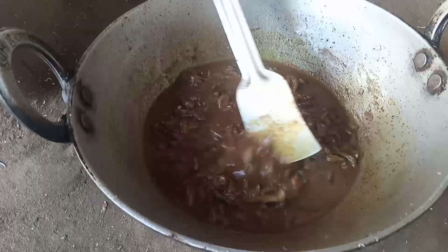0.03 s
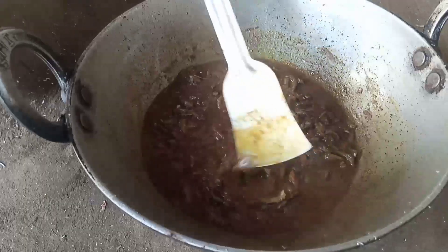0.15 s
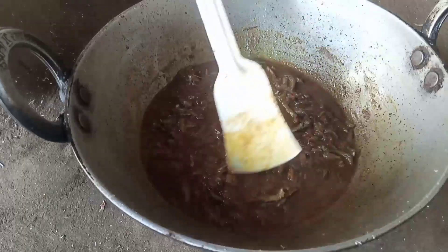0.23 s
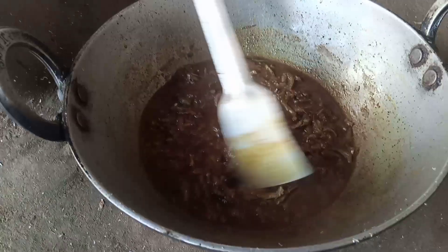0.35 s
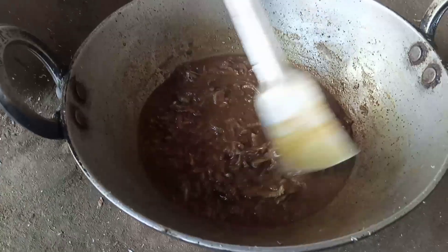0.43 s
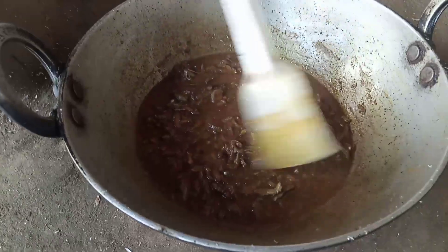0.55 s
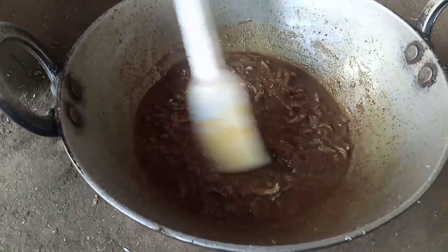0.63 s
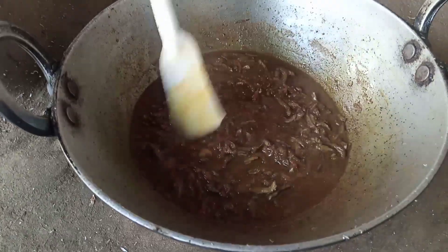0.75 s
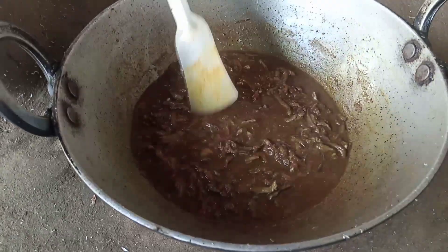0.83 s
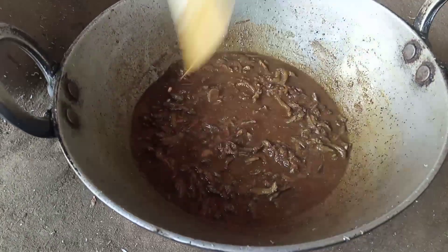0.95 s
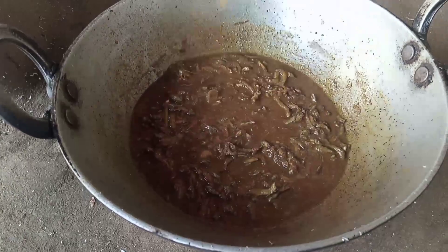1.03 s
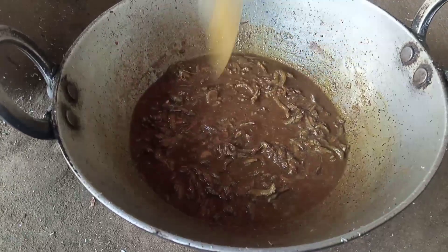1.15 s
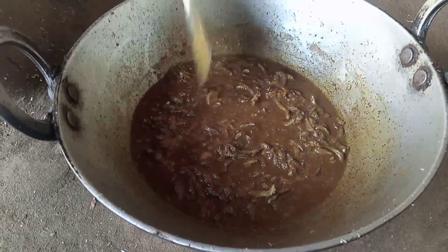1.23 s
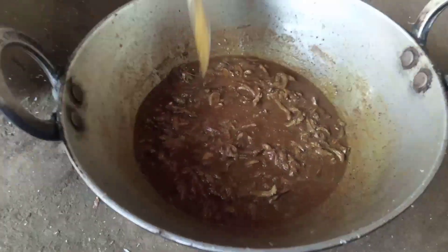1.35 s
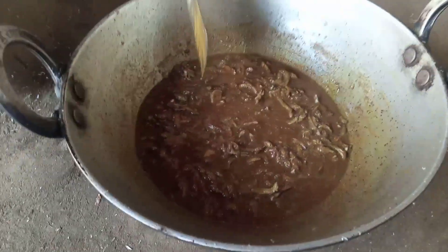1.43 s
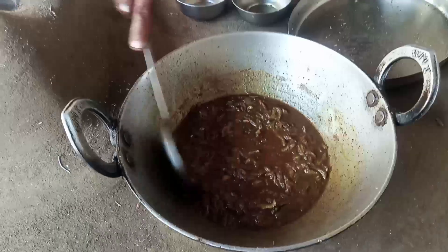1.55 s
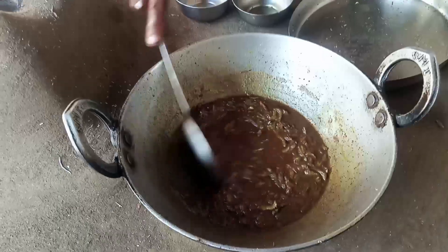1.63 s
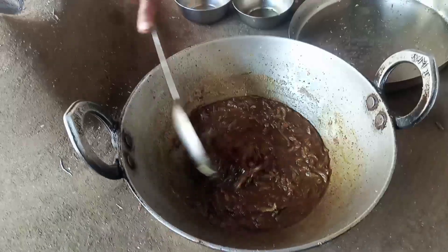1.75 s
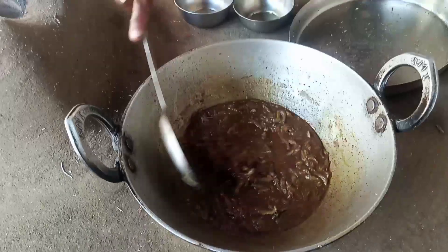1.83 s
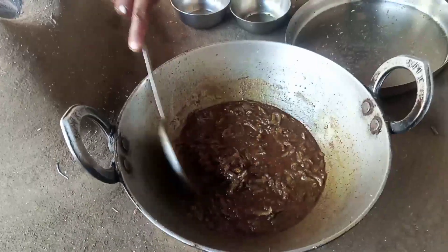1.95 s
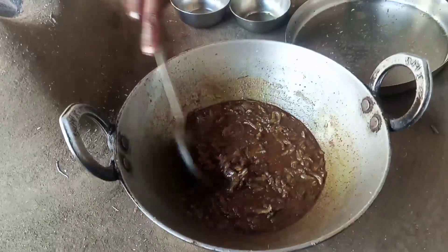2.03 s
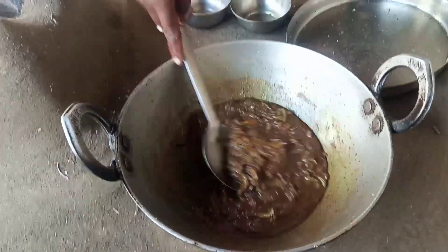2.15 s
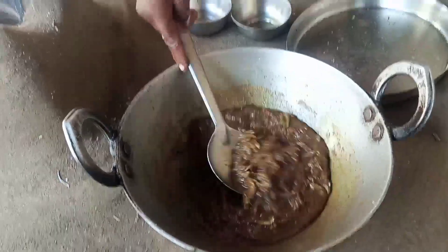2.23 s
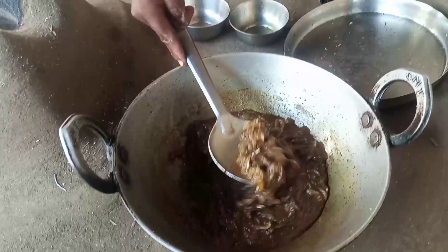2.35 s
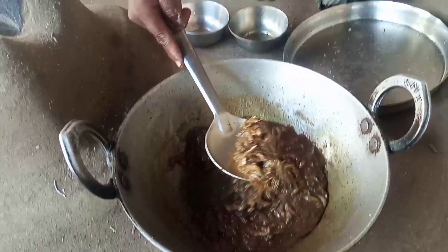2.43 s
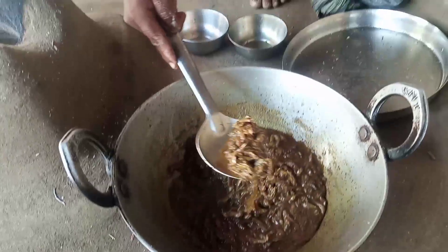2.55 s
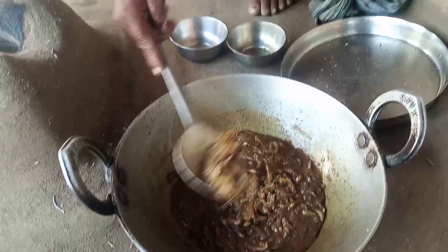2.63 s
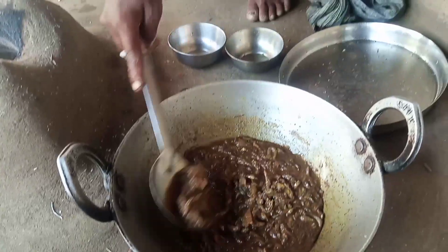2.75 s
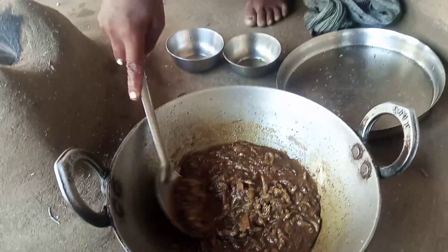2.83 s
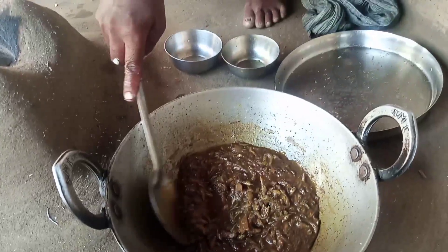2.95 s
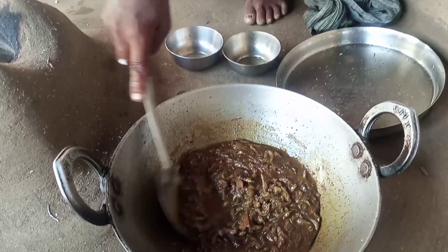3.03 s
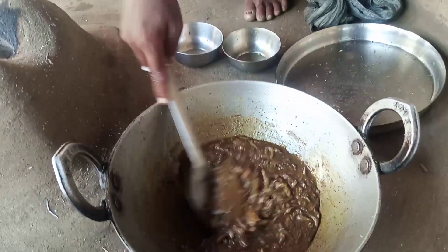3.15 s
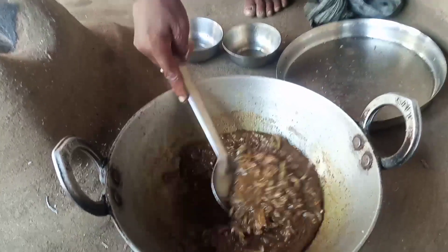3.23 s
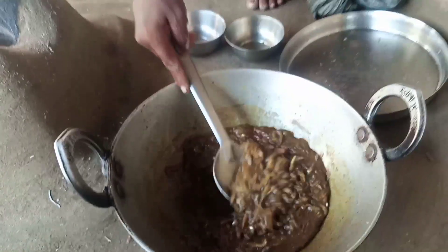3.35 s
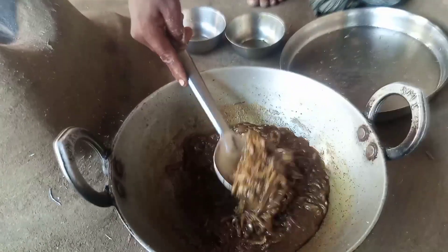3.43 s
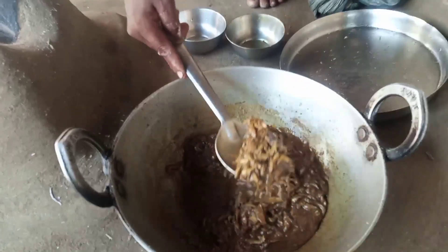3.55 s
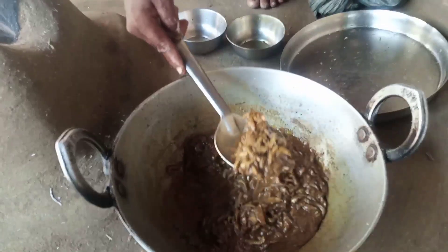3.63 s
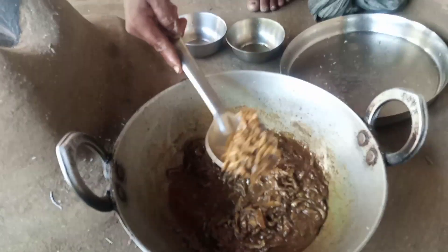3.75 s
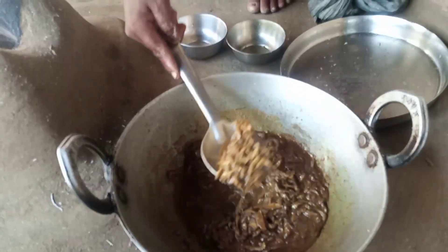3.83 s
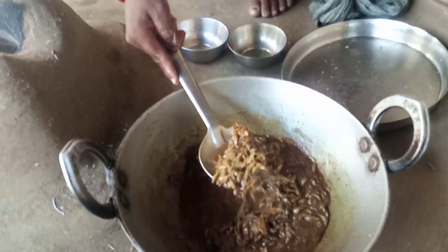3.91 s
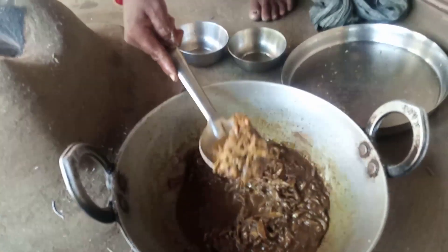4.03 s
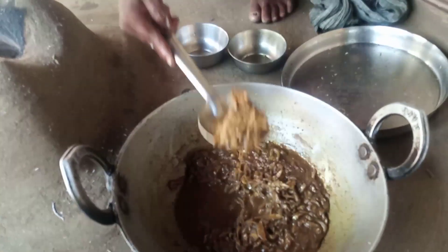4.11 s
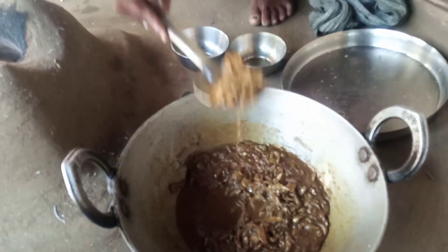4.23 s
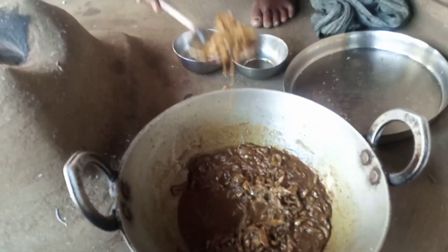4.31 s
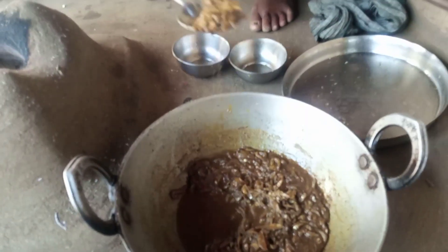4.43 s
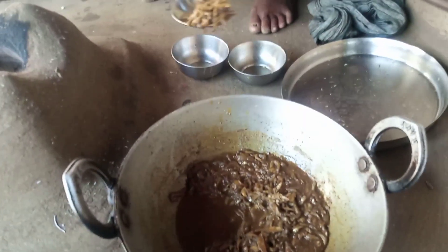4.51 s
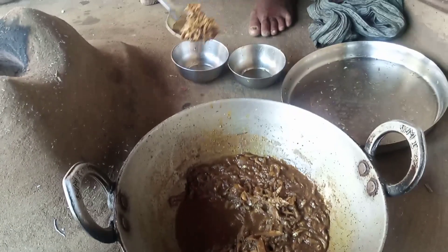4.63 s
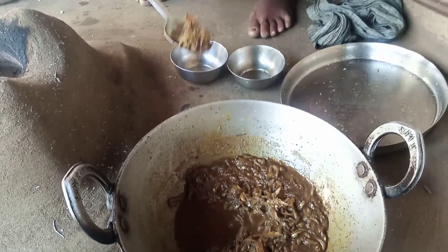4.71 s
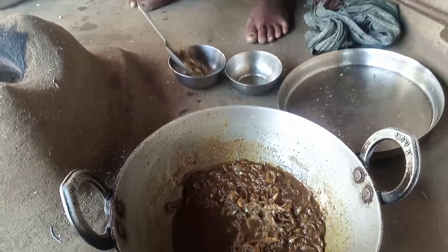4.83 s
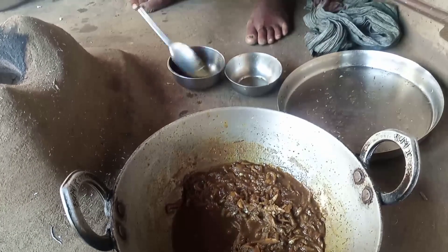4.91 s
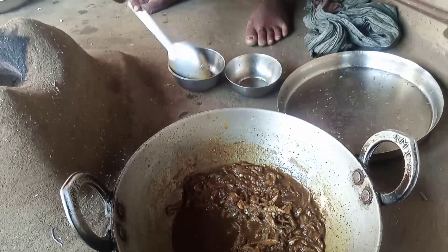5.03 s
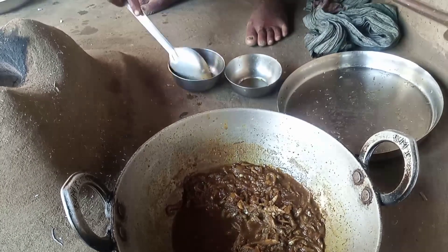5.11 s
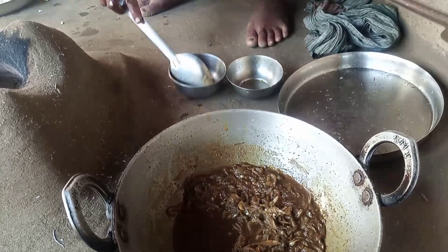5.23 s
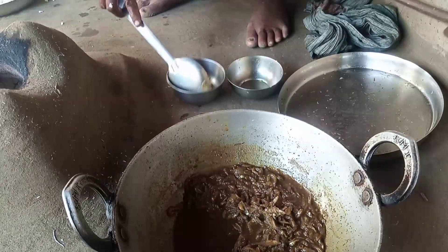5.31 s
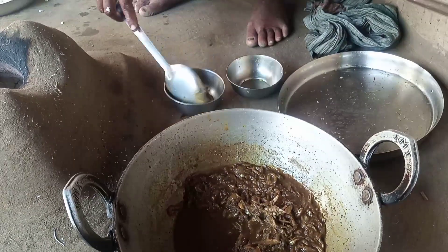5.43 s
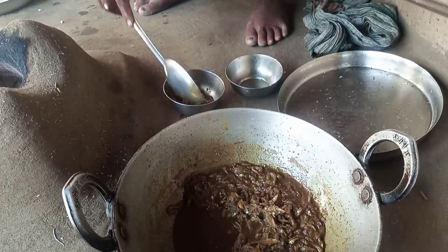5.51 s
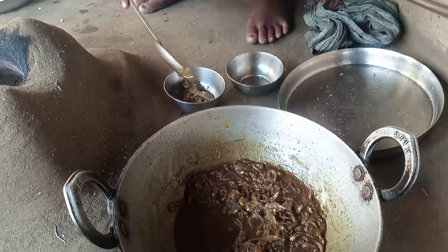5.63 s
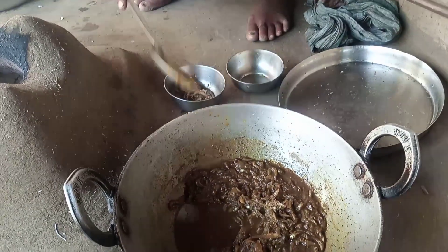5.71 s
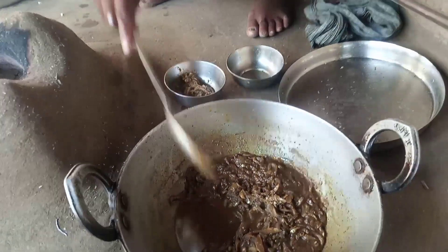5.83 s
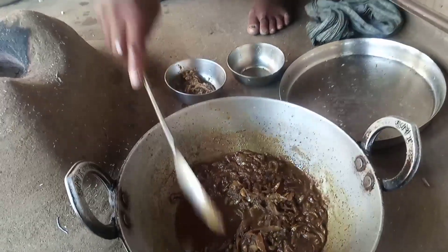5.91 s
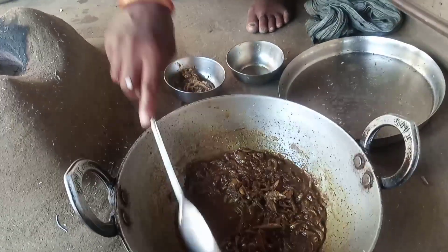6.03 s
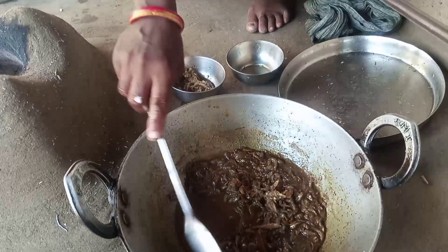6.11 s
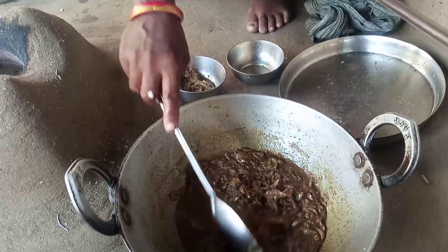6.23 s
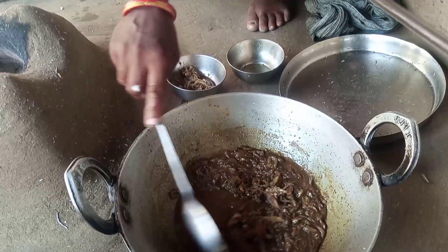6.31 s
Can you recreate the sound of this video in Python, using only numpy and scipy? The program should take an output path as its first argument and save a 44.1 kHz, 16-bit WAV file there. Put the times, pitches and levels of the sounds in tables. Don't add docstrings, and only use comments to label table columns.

```python
import sys
import numpy as np
from scipy import signal
from scipy.fft import rfft, irfft, next_fast_len
from scipy.io import wavfile
from scipy.ndimage import uniform_filter1d

SR = 44100
rng = np.random.default_rng(int(sys.argv[2]) if len(sys.argv) > 2 else 0)


def convert_level_to_amplitude(level_db):
    exponent = np.asarray(level_db, float) / 20
    return 10 ** exponent


def persist_wave(psi):
    counts = np.round(np.clip(psi, -1, 1) * 32767).astype(np.int16)
    wavfile.write(sys.argv[1], SR, np.atleast_2d(counts).T)


N = 280917
T = np.arange(N) / SR
LOG_60DB = np.log(1000)

# start_s, end_s
SILENCE_S = (1.484, 1.635)
# start_s, end_s
SCOOP_SPAN_S = (3.0, 3.35)

# low_hz, high_hz
REGISTERS = [(500, 2400), (2400, 8000), (8000, 15800)]
# pitch_hz, level_db, t60_s
POT_SIDE_MODES = [(685, -10.5, 0.013), (1108, -10, 0.059), (1353, 1, 0.032), (1565, 2.5, 0.069),
                  (2051, -12, 0.02), (2670, -8, 0.017), (1628, -3, 0.032), (4600, -11, 0.06),
                  (5230, -6.5, 0.031), (880, -7, 0.02), (6337, -1, 0.054), (7450, -11, 0.05)]
# pitch_hz, level_db, t60_s
POT_FLOOR_MODES = [(773, -1.5, 0.0206), (1738, -3, 0.036), (2480, -15, 0.048), (3053, -1, 0.059),
                   (4210, -16, 0.041), (4310, -4, 0.018), (5140, 5.5, 0.011), (6450, 2, 0.0099),
                   (6900, -3.5, .04), (7050, -1, 0.008)]
# pitch_hz, level_db, t60_s
BOWL_MODES = [(781, -34, .4), (1453, -21, 0.6), (2272, -27, .5), (3225, -24, 0.25), (4274, -24, 0.3),
              (5362, -21, 0.19), (6422, -14, 0.14), (9830, 0, 0.058), (10450, -5, 0.065),
              (10570, -14, 0.094), (11320, -11, 0.096), (7640, -24, 0.3), (14580, -16, 0.082),
              (15150, -18, 0.08)]
# pitch_hz, level_db, t60_s
SPOON_MODES = [(1195, -1, 0.17), (1448, 0, 0.09), (1685, -8, 0.32), (2272, -7, 0.47), (3100, -16, 0.05),
               (4544, -16, 0.13), (5663, -2, 0.28), (6385, -5, 0.15), (7133, -10, 0.093), (7386, -6, 0.14),
               (7650, 0, 0.2), (8430, -11, 0.2), (9620, -5, 0.07), (9900, -2, 0.07), (11480, -10, 0.13),
               (14610, -7, 0.11), (15340, -7, 0.084)]
# pitch_hz, level_db, t60_s
HANDLE_MODES = [(1895, -1, 0.88), (2848, -5, 0.064), (3714, -1, 0.97), (4678, 0, 0.25), (5782, -7, 0.2),
                (6735, -7, 0.098), (7510, -12, 0.13), (9598, -10, 0.14), (11310, -6, 0.054),
                (14870, -9, 0.12)]
# pitch_hz, width_hz, level_db
POT_WET_PEAKS = [(678, 85, 1), (1111, 58, 1), (1783, 44, -13.5), (2626, 30, -4), (4530, 61, -1.5),
                 (5730, 44, -2.5), (6500, 50, -12), (7360, 77, -9), (7620, 27, -20.5), (8520, 51, -13),
                 (9770, 110, -7), (10300, 91, -11), (11100, 42, -14), (11900, 31, -15)]
# pitch_hz, width_hz, level_db
BOWL_RIM_PEAKS = [(1344, 110, -12), (2470, 40, -7.5), (4380, 110, -6), (5680, 73, -10), (6170, 45, -8),
                  (6800, 67, -4.5), (7070, 69, -13), (7540, 86, -18), (8870, 52, -14), (10000, 38, -4),
                  (10700, 78, -7), (11300, 70, -5.5), (14200, 57, -10), (14600, 160, -5)]
# pitch_hz, width_hz, level_db
SPOON_EDGE_PEAKS = [(8740, 43, -1), (9530, 40, -3), (10500, 46, -7.5), (11500, 130, -11.5),
                    (11600, 350, -13), (12800, 63, -20), (14200, 54, -10), (14600, 94, -5.5),
                    (15300, 230, -7)]

# start_s, rim_db, wall_db (the spoon's edge follows the rim)
POT_HITS = [(1.6789, -43.5, -83), (2.0874, -8, -22.5), (2.135, -11.5, -24.5), (2.1473, -28, -28),
            (2.157, -16.5, -25.5), (2.172, -33, -42), (2.1755, -23, -34), (2.1795, -23, -33.5),
            (2.212, -38.5, -38), (2.635, -84.5, -59), (2.9162, -14.5, -33.5), (3.1443, -41.5, -86),
            (3.1647, -47.5, -60), (3.1759, -27, -47.5), (3.1915, -29.5, -49), (3.2093, -18, -36),
            (3.2267, -20.5, -36), (3.2402, -29, -64), (3.2526, -20.5, -61), (3.2585, -37, -60),
            (3.2906, -33.5, -44.5), (3.3115, -43, -63), (3.342, -67, -83), (3.3685, -36.5, -43.5),
            (4.0611, -42.5, -80.5), (4.0918, -58, -66), (5.7978, -39, -72), (6.1733, -44.5, -44),
            (6.177, -42, -46), (6.1982, -47, -59), (6.2047, -51, -58), (6.2135, -45, -55.5),
            (6.2605, -60, -74)]
# start_s, rim_db, wall_db
BOWL_HITS = [
    (4.9566, -23, -29.5),
    (5.018, -23.5, -39),
    (5.0875, -45.5, -55.5),
    (5.1348, -19, -41.5),
    (5.3091, -36.5, -51.5),
]
# start_s, rim_db, wall_db
SPOON_HITS = [
    (5.1339, -16.5, -45.5),
    (5.153, -23, -51),
    (5.1645, -22.5, -71),
]
# start_s, rim_db, wall_db
HANDLE_HITS = [
    (4.955, -10.5, -51),
    (5.019, -14, -30.5),
    (5.2347, -21, -33.5),
    (5.2438, -23, -43),
    (5.253, -25.5, -34.5),
    (5.2604, -20.5, -48),
    (5.311, -30.5, -50),
    (5.32, -29.5, -45),
    (6.2617, -50.5, -60),
]
# start_s, rim_db, wall_db
RIM_HITS = [
    (5.3977, -47, -66),
    (5.4593, -40.5, -54),
    (5.638, -61, -67),
]

# peak_s, press_s, release_s, level_db, brightness_db
POT_SCRAPES = [(1.669, 0.052, 0.067, -65.5, 6), (2.142, 0.0044, 0.056, -29.5, 3),
               (2.18, 0.021, 0.077, -36, -6), (2.238, 0.16, 0.03, -42.5, -1),
               (2.489, 0.15, 0.3, -59.5, -31.5), (2.87, 0.053, 0.14, -69, -13),
               (2.92, .003, 0.0086, -43, -9), (3.194, 0.1, 0.048, -65, 14.5),
               (3.224, 0.057, .13, -37.5, -7.5), (4.29, 0.03, 0.3, -67.5, -15), (4.36, 0.045, 0.49, -77, 1),
               (5.634, 0.11, 0.066, -63.5, -4), (5.81, 0.047, 0.079, -64, 5.5),
               (6.183, 0.012, 0.05, -61.5, -9), (6.209, 0.059, 0.028, -55, 4),
               (6.251, 0.11, 0.27, -72.5, 4)]
# peak_s, press_s, release_s, level_db, brightness_db
SPOON_SCRAPES = [
    (5.143, 0.01, 0.084, -40, 5),
    (5.248, 0.077, 0.064, -52, -1.5),
    (5.302, 0.0057, 0.093, -51.5, -36.5),
    (5.38, 0.79, 0.13, -66, 10),
]
# peak_s, press_s, release_s, level_db, brightness_db
RIM_SCRAPES = [
    (5.42, 0.067, .06, -63, 6.5),
    (5.476, 0.048, 0.17, -53, 7.5),
    (5.545, 0.2, 0.057, -60, 7),
]
# peak_s, press_s, release_s, level_db,
# brightness_db
SOFT_RUSTLES = [(.022, 0.033, 0.22, -73.5, 13), (.45, 0.012, 0.079, -73.5, -3),
                (.575, 0.022, 0.06, -66.5, -2), (.61, 0.056, 0.042, -67, 4), (.69, 0.1, 0.13, -73, -28),
                (1.13, 0.083, 0.17, -73.5, 5), (1.39, 0.3, 0.13, -62.5, 11.5),
                (1.478, 0.15, 0.058, -55, 8), (2.5, 0.12, 0.07, -65, -23), (5.77, .07, .12, -71.5, 12.5),
                (4.93, 0.89, 0.19, -68, 1), (6.0, 1, 0.56, -77, 3)]
# low_hz, high_hz
RUSTLE_BANDS = [(500, 3400), (1500, 4740), (4800, 21000)]

# start_s, level_db, pitch_hz
POT_THUDS = [(1.302, -51.5, 240), (1.379, -54, 115), (2.088, -33.5, 240), (2.134, -43.5, 221),
             (2.177, -41, 204), (2.632, -47.5, 125.7), (2.694, -52.5, 178), (2.735, -59, 173),
             (2.797, -55, 105.5), (2.918, -46, 239), (2.715, -53.5, 175.4), (2.755, -55, 172),
             (2.775, -57.5, 175), (1.17, -62, 480), (3.67, -58, 300), (3.366, -49.5, 213),
             (4.395, -51.5, 230), (4.954, -53, 131), (5.61, -42.5, 258), (5.783, -45.5, 229),
             (5.796, -38, 226), (5.94, -61, 250), (5.977, -53, 360), (5.99, -54, 300), (6.012, -57, 250),
             (6.172, -40.5, 232)]
# start_s, level_db, pitch_hz
FOOD_TICKS = [(0.019, -47, 7000), (.1794, -52, 9000), (.4394, -50, 9200), (.5894, -56, 9500),
              (.6848, -60, 3870), (1.111, -48, 8900), (1.3092, -48, 1950), (1.3675, -46.5, 1120),
              (.468, -65, 4670), (.47, -66.5, 2400), (2.359, -69, 7000), (2.392, -62.5, 4950),
              (2.472, -66, 9150), (3.393 , -66, 10000), (3.611, -65, 4520), (3.634, -65.5, 6500),
              (4.046, -63.5, 6500), (2.4314, -54, 9400), (2.5306, -60, 8650), (3.5241, -60.5, 7830),
              (3.617, -44.5, 15500), (3.918, -53.5, 14830), (4.2033, -55, 10100), (4.344, -54, 8850),
              (4.12, -66, 10000), (4.4294, -62.5, 9580), (4.469, -58, 10300), (4.497, -63, 10000),
              (4.5364, -73.5, 8000), (4.6754, -58.5, 9060), (6.273, -60, 10200), (6.33, -55, 8500)]

# start_s, length_s, pitch_hz, level_db
SPARROW_HIGH = [(0.28, 0.033, 5100, -87), (1.759, 0.086, 5100, -65), (1.768, 0.012, 5300, -65),
                (2.417, 0.066, 5030, -68), (3.353, 0.039, 4540, -69.5), (3.428, 0.031, 4600, -72.5),
                (3.645, 0.064, 4520, -70.5), (3.787, 0.11, 5050, -70), (4.135, 0.0297, 4730, -73.5),
                (4.17, 0.04, 5700, -80), (4.209, 0.1, 4796, -67.5), (1.77, 0.032, 4450, -71),
                (1.734, .04, 5300, -77), (4.86, .095, 5150, -73.5), (5.848, 0.04, 4850, -73),
                (5.885, 0.05, 4650, -73.5), (5.665, .04, 4950, -82), (2.445, .08, 5000, -70.5),
                (3.63, 0.046, 5200, -83)]
# start_s, length_s, pitch_hz, level_db
SPARROW_SWOOPS = [
    (1.713, 0.083, 4900, -70.5),
    (1.79, .062, 3550, -53),
    (2.485, .046, 4340, -63),
    (5.703, 0.062, 3700, -68),
    (2.49, 0.083, 3100, -70),
]
# start_s, length_s, pitch_hz, level_db
SPARROW_RISING = [
    (4.115, 0.019, 2470, -65.5),
    (4.128, 0.016, 2370, -74.5),
    (4.129, 0.022, 3940, -74.5),
]
# start_s, pitch_hz, level_db
SPARROW_LOW = [(0.882, 3240, -81.5), (1.195, 3150, -76), (1.776, 3544, -62), (1.845, 3560, -59),
               (2.49, 3406, -60), (3.405, 3300, -62.5), (3.704, 3420, -77), (3.745, 3140, -60.5),
               (3.907, 3620, -62.5), (4.159, 3390, -75), (4.305, 3465, -61.5), (4.382, 3107, -62.5),
               (4.738, 3310, -67), (5.626, 3540, -61), (5.919, 3230, -69)]
# start_s, held_s, level_db, fading_db_per_s
WHISTLE_CALLS = [
    (1.836, 0.23, -63, 402.5),
    (3.26, 0.19, -61, 178),
    (4.542, 0.26, -77.5, 296),
    (5.75, 0.37, -74, 303),
]

# pitch_hz, level_db (per Hz)
CICADA_SPECTRUM = [(2650, -61), (4500, -50), (5050, -46.5), (5590, -36), (6510, -9.5), (6840, -18.5),
                   (8400, 5.5), (12000, -31.5), (15600, -69), (22000, -120)]
# pitch_hz, level_db
CICADA_SINGERS = [(6595, -94.5), (6874, -90.5), (7025, -80.5), (7284, -84), (7450, -82.5), (7655, -86.5),
                  (8662, -77), (8926, -88)]
# time_s, level_db
CICADA_LEVEL = [(0.0, -59), (1.326, -59.5), (1.484, -128)]
# pitch_hz, level_db (per Hz)
YARD_SPECTRUM = [(18, -33.5), (30, 3), (202, -1), (519, -11), (650, -26), (1380, -14), (2500, -20),
                 (3250, -43), (5500, -120)]
# time_s, level_db
YARD_LEVEL = [(0, -84.5), (1.036, -81.5), (1.25, -74.5), (1.316, -70), (1.484, -66), (1.635, -88),
              (1.7, -81.5), (1.77, -72), (2.15, -70.5), (2.75, -70), (3.02, -75.5), (3.4, -72), (4.13, -73),
              (5.13, -66.5), (6.37, -70)]
# pitch_hz, width_hz, level_db
VESSEL_HUMS = [(817, 11, -18.5), (524, 19, -14), (240, 110, -10.5)]
# peak_s, press_s, release_s, level_db, brightness_db
VESSEL_SWELLS = [
    (4.31, 0.033, 0.45, 9.1, 0),
    (5.0, 0.47, 1, 5.3, 0),
    (5.66, 0.12, 0.1, 6, 0),
    (6.2, 0.093, 0.24, 16.5, 0),
]
# pitch_hz, level_db (per Hz)
HISS_SPECTRUM = [(1500, -12.5), (4000, -7), (9000, -10), (12500, -12), (15200, 2), (15800, -31)]
# pitch_hz, level_db
MICROPHONE_RESPONSE = [(30, -17), (70, 0), (150, -1.5), (10000, -1), (12800, -8.5), (15000, -4), (15600, 2),
                       (16200, -15.5)]


def unit(x):
    return x / np.sqrt(np.mean(x ** 2))


def band(x, lo_hz, hi_hz, order=2):
    return signal.sosfilt(signal.butter(order, [lo_hz, hi_hz], "band", fs=SR, output="sos"), x)


def colour(x, points):
    hz, db = np.transpose(points)
    size = next_fast_len(N)
    log_hz = np.log(np.fft.rfftfreq(size, 1 / SR) + 1)
    gain = convert_level_to_amplitude(np.interp(log_hz, np.log(hz), db, left=-60, right=-60))
    return irfft(rfft(x, size) * gain, size)[:N]


def coloured(points):
    return unit(colour(rng.standard_normal(N), points))


def walk(rate_hz):
    k = int(SR / rate_hz)
    return unit(uniform_filter1d(uniform_filter1d(rng.standard_normal(N), k), k))


def curve(points):
    return convert_level_to_amplitude(np.interp(T, *np.transpose(points)))


def strokes(rows, bright, offset_db):
    span_db, bend = 31.5, 1.3
    out = np.zeros(N)
    for s, press, let_go, db, bright_db in rows:
        i = slice(max(int((s - 2 * press) * SR), 0), int((s + 2 * let_go) * SR))
        away = np.where(T[i] < s, (s - T[i]) / press, (T[i] - s) / let_go)
        out[i] += convert_level_to_amplitude(db + offset_db + bright * bright_db - span_db * away ** bend)
    return out


def grit(scatter_db, patchy_db):
    size = convert_level_to_amplitude(scatter_db * rng.exponential(size=N) + patchy_db * walk(90))
    return unit(rng.standard_normal(N) * size)


def ring(x, hz, t60):
    radius, turn = np.exp(-LOG_60DB / (t60 * SR)), 2 * np.pi * hz / SR
    return signal.lfilter([.5, 0, -.5], [1, -2 * radius * np.cos(turn), radius ** 2], x)


def rings(peaks):
    return [(hz, db, 2.2 / max(width, 10)) for hz, width, db in peaks]


def echo(x, t60, wet_db):
    age = T[:SR // 2]
    tail = rng.standard_normal(len(age)) * np.exp(-LOG_60DB * age / t60) * np.tanh(age / 0.006)
    return convert_level_to_amplitude(wet_db) * signal.oaconvolve(x, tail / np.sqrt(np.sum(tail ** 2)))[:len(x)]


def microphone_hiss():
    return convert_level_to_amplitude(-82.5 + 1.2 * walk(30)) * coloured(HISS_SPECTRUM)


def yard():
    air = coloured(YARD_SPECTRUM) * convert_level_to_amplitude(2.1 * walk(12))
    hum = np.zeros(N)
    for hz, width, db in VESSEL_HUMS:
        tone = unit(band(rng.standard_normal(N), hz - width / 2, hz + width / 2))
        hum += convert_level_to_amplitude(db + 1.1 * walk(9)) * tone
    hum_gain = convert_level_to_amplitude(-3) + strokes(VESSEL_SWELLS, 0, 0)
    return curve(YARD_LEVEL) * (air + hum_gain * hum)


def cicadas():
    hiss = coloured(CICADA_SPECTRUM) * convert_level_to_amplitude(-6.0 + 0.51 * walk(180))
    lines = np.zeros(N)
    for hz, db in CICADA_SINGERS:
        lines += convert_level_to_amplitude(db + 70.0) * unit(ring(rng.standard_normal(N), hz, 0.064))
    return curve(CICADA_LEVEL) * (hiss + lines)


def whistling_bird():
    held = np.zeros(N)
    for s, length, db, fade in WHISTLE_CALLS:
        i = int(s * SR)
        age = T[i:] - s
        held[i:] += np.tanh(np.abs(age) / 0.012) * convert_level_to_amplitude(db - fade * np.clip(age - length, 0, .4))
    phase = 2 * np.pi * np.cumsum(1363 * (1 + 0.0028 * walk(17))) / SR
    voice = np.sin(phase) + convert_level_to_amplitude(-24) * np.sin(2 * phase)
    return np.sqrt(2) * held * convert_level_to_amplitude(1.5 * walk(30)) * voice


def sparrows():
    out, flutter = np.zeros(N), walk(260)
    notes = [(*row, 0.14, 1.9) for row in SPARROW_HIGH]
    notes += [(*row, .33, 1.4) for row in SPARROW_SWOOPS]
    notes += [(*row, -0.253, 0.95) for row in SPARROW_RISING]
    notes += [(s, 0.022, hz, db, .14, 0.95) for s, hz, db in SPARROW_LOW]
    for s, length, hz, db, fall, bend in notes:
        i = slice(int(s * SR), int((s + length) * SR))
        u = np.abs(T[i] - s) / length
        pitch = hz * (1 - fall * u ** bend) * (1 + .013 * flutter[i])
        phase = 2 * np.pi * np.cumsum(pitch) / SR
        voice = np.sin(phase) + convert_level_to_amplitude(-32) * np.sin(2 * phase)
        swell = np.abs(np.sin(np.pi * u)) ** 0.23
        out[i] += convert_level_to_amplitude(db + 8.0 + 3.0 * flutter[i]) * swell * voice
    return out + echo(out, 0.18, -0.24) + echo(out, 0.34, -18.0)


def soft_rustle():
    out = np.zeros(N)
    for (lo, hi), bright, db in zip(RUSTLE_BANDS, (0, 0, 1), (-6, 0, 0)):
        out += strokes(SOFT_RUSTLES, bright, db) * unit(band(grit(0.7, 3.2), lo, hi))
    return out


def ticks():
    out, age = np.zeros(N), T[:800]
    for s, db, hz in FOOD_TICKS:
        i = int(s * SR)
        burst = rng.standard_normal(len(age)) * np.exp(-age / .004)
        grain = band(burst, hz * .86, min(hz * 1.16, SR / 2.2))
        out[i:i + len(age)] += convert_level_to_amplitude(db) * grain / np.max(np.abs(grain))
    return out


def thuds():
    out, age = np.zeros(N), T[:8000]
    slap = unit(band(rng.standard_normal(N), 87, 470))
    swell = np.exp(-LOG_60DB * age / 0.078) * np.tanh(age / 0.0012)
    for s, db, hz in POT_THUDS:
        i = slice(int(s * SR), int(s * SR) + len(age))
        out[i] += convert_level_to_amplitude(db - 3) * swell * (np.sin(2 * np.pi * hz * age) + .6 * slap[i])
    return out


def metal(modes, blows, rubs, contact_ms, longest_s, ring_db, crack_db, clatter_db, edge_db,
          rub_db=0, rasp_db=0, edge_rub_db=0, scatter=1.0):
    blur_s = .006
    out, n = np.zeros(N), np.arange(1200)
    live = slice(int(blows[0][0] * SR) - 2000, int((blows[-1][0] + .5) * SR))
    waver = convert_level_to_amplitude(3 * walk(60) + 2.5 * walk(10) - 1.5)
    fall = np.exp(-n / (contact_ms * SR / 1000)) * np.tanh(n / 25)
    for (lo, hi), part in zip(REGISTERS, ("wall", "rim", "edge")):
        own = []
        for hz, db, t60 in modes:
            if lo <= hz < hi:
                own.append((hz, convert_level_to_amplitude(db), np.clip(t60, .01, longest_s * np.sqrt(2000 / hz))))
        tap, crack, drag = np.zeros(N), np.zeros(N), np.zeros(N)
        for s, rim_db, wall_db in blows:
            i = int(s * SR)
            size = convert_level_to_amplitude({"wall": wall_db, "rim": rim_db - 10.6, "edge": rim_db + edge_db}[part])
            tap[i] += size
            crack[i:i + len(n)] += size * fall * rng.standard_normal(len(n))
        if rubs:
            drag = strokes(rubs, part != "wall", edge_rub_db * (part == "edge")) * grit(2.5, 3.0)
        struck = np.sqrt(sum(g ** 2 for _, g, _ in own))
        bowed = np.sqrt(sum(g ** 2 * t60 * SR / (4 * LOG_60DB) for _, g, t60 in own))
        hit = (1.6 - scatter) * tap + scatter * crack / np.sqrt(np.sum(fall ** 2))
        force = (convert_level_to_amplitude(ring_db) * hit / struck + convert_level_to_amplitude(rub_db) * drag / bowed)[live]
        for hz, g, t60 in own:
            out[live] += g * ring(force, hz, t60) * np.roll(waver, 17 * int(hz))[live]
        raw = convert_level_to_amplitude(crack_db) * (crack + 1.1 * tap)[live]
        raw = raw + echo(crack[live], 0.11, clatter_db) + convert_level_to_amplitude(rasp_db) * drag[live]
        broad = sum(g * ring(raw, hz, blur_s) for hz, g, _ in own) / struck
        broad = broad / np.sqrt(blur_s * SR / (4 * LOG_60DB))
        flat = band(raw, max(lo, 1.017 * own[0][0]), hi, order=3) * np.sqrt(SR / 2 / (hi - lo))
        out[live] += convert_level_to_amplitude(-5) * broad + convert_level_to_amplitude(-3) * flat
    return out


def bowl_rim():
    return metal(rings(BOWL_RIM_PEAKS), RIM_HITS, RIM_SCRAPES, contact_ms=2.1, longest_s=.2,
                 ring_db=1.03, crack_db=1.5, clatter_db=-9, edge_db=-3.0,
                 rub_db=-6, rasp_db=-4, edge_rub_db=5.4)


def bowl():
    return metal(BOWL_MODES, BOWL_HITS, [], contact_ms=2.1, longest_s=0.7,
                 ring_db=-6.0, crack_db=1.4, clatter_db=0.48, edge_db=0.93, scatter=0.69)


def handle():
    return metal(HANDLE_MODES, HANDLE_HITS, [], contact_ms=0.93, longest_s=0.036,
                 ring_db=1.0, crack_db=-11.5, clatter_db=-3.5, edge_db=-12.5, scatter=0.45)


def spoon():
    return metal(SPOON_MODES, SPOON_HITS, SPOON_SCRAPES, contact_ms=2.2, longest_s=0.25,
                 ring_db=3.4, crack_db=2.4, clatter_db=1.0, edge_db=-4.5,
                 rub_db=-12.5, rasp_db=-1.3, edge_rub_db=5, scatter=0.81)


def between(rows, start_s, end_s):
    return [row for row in rows if start_s < row[0] < end_s]


def pot():
    (a, b), edge = SCOOP_SPAN_S, rings(SPOON_EDGE_PEAKS)
    side = metal(POT_SIDE_MODES + edge, between(POT_HITS, 0, a), between(POT_SCRAPES, 0, a),
                 contact_ms=2.2, longest_s=0.084, ring_db=1.6, crack_db=2.5, clatter_db=-10.5,
                 edge_db=-20.0, rub_db=-8.6, rasp_db=-3.5, edge_rub_db=-8)
    floor = metal(POT_FLOOR_MODES + edge, between(POT_HITS, a, b), between(POT_SCRAPES, a, b),
                  contact_ms=3.1, longest_s=0.035, ring_db=1.5, crack_db=1.5, clatter_db=-5.5,
                  edge_db=-13.5, rub_db=-9.5, rasp_db=-7.0, edge_rub_db=-5)
    wet = metal(rings(POT_WET_PEAKS) + edge[-3:], between(POT_HITS, b, T[-1]), between(POT_SCRAPES, b, T[-1]),
                contact_ms=1.67, longest_s=0.046, ring_db=3.5, crack_db=0.55, clatter_db=-4.5,
                edge_db=-17.5, rub_db=-1.5, rasp_db=-2, edge_rub_db=-8, scatter=0.61)
    return side + floor + wet


def scene():
    near = pot() + bowl() + spoon() + handle() + bowl_rim() + thuds() + ticks()
    around = soft_rustle() + sparrows() + whistling_bird() + cicadas() + yard() + microphone_hiss()
    mix = near + echo(near, 0.19, -31.0) + around
    start, end = SILENCE_S
    gate = np.clip(np.maximum((start - T) / 0.0019, (T - end) / 0.002), 0, 1)
    return (mix * gate)[None]


def band_limit(x):
    return signal.sosfilt(signal.butter(12, 16820, fs=SR, output="sos"), x)


def record(dry):
    mix = colour(dry[0], MICROPHONE_RESPONSE)[None]
    return band_limit(mix)


dry = scene()
out = record(dry)
persist_wave(out)
```